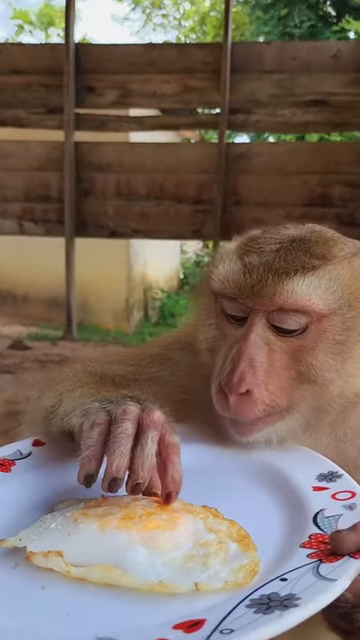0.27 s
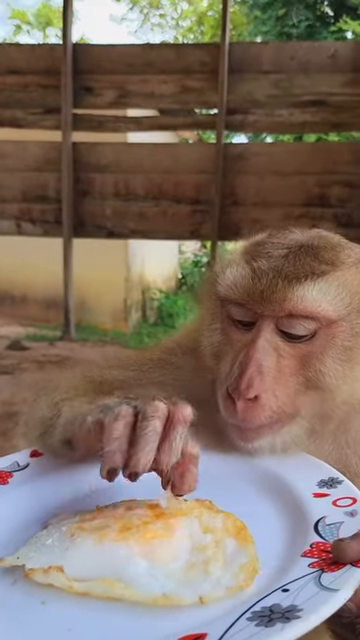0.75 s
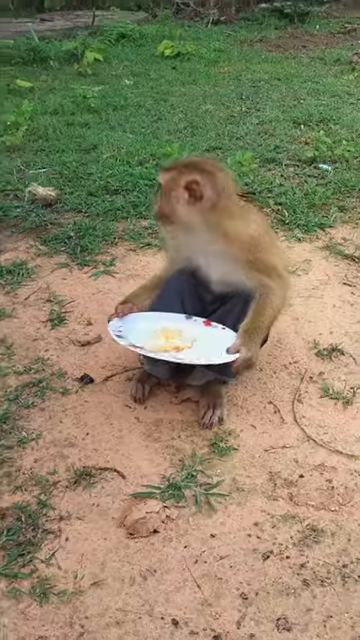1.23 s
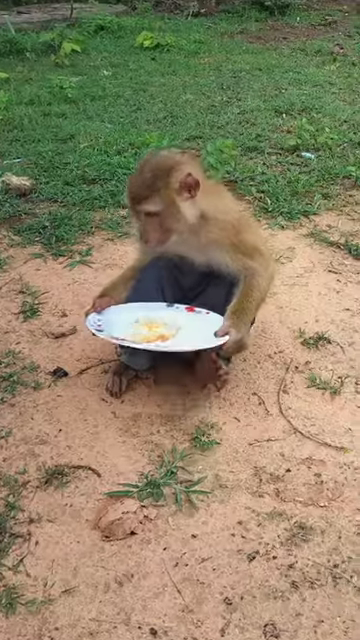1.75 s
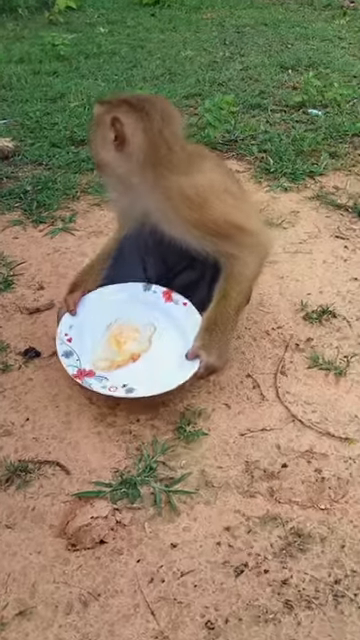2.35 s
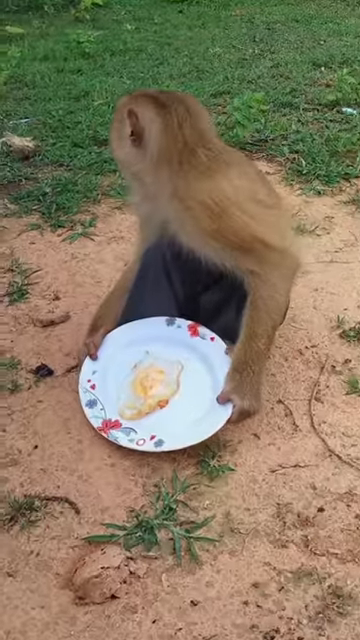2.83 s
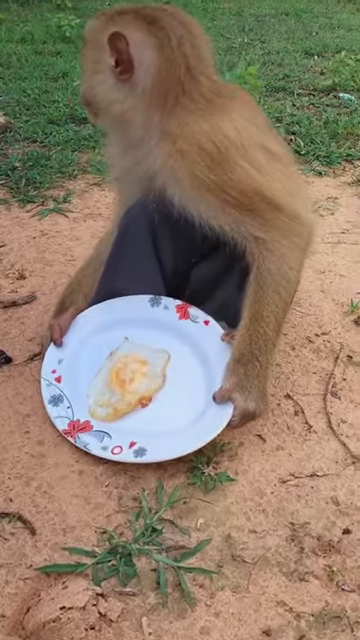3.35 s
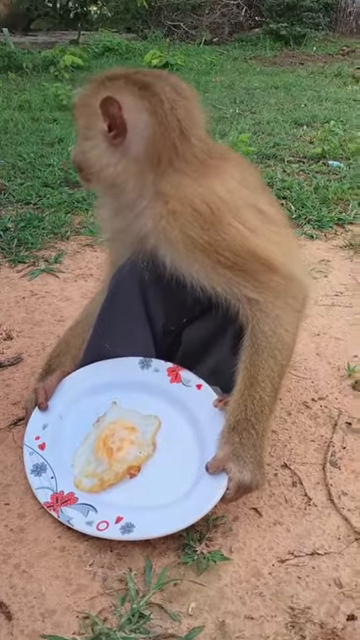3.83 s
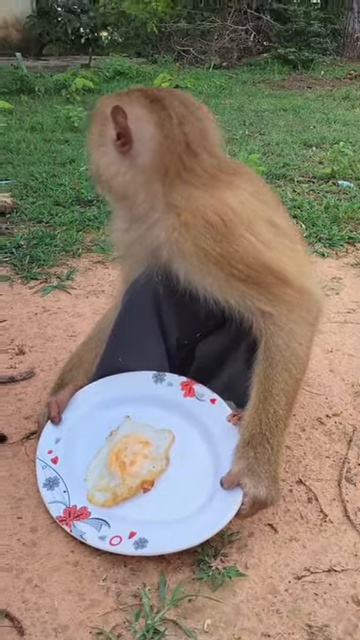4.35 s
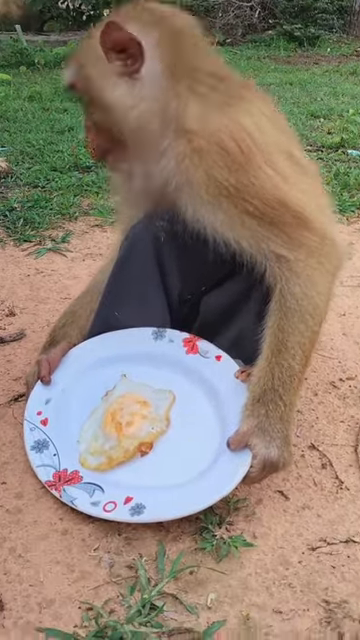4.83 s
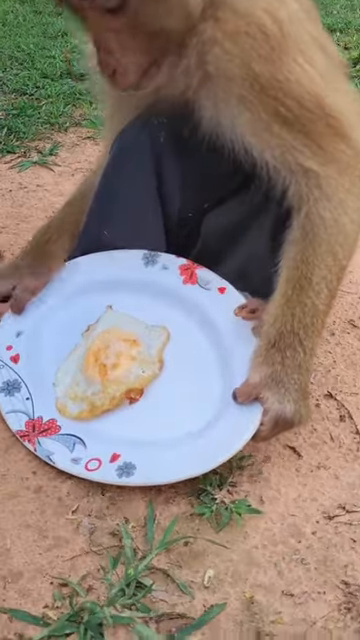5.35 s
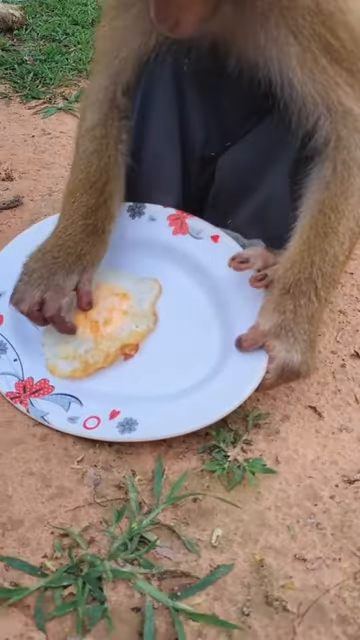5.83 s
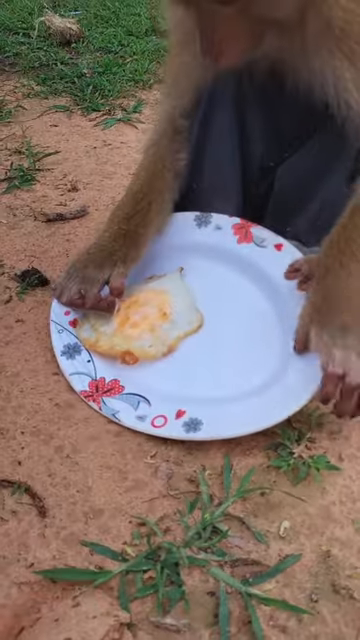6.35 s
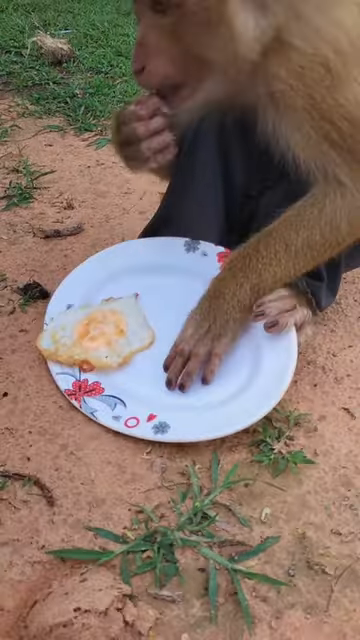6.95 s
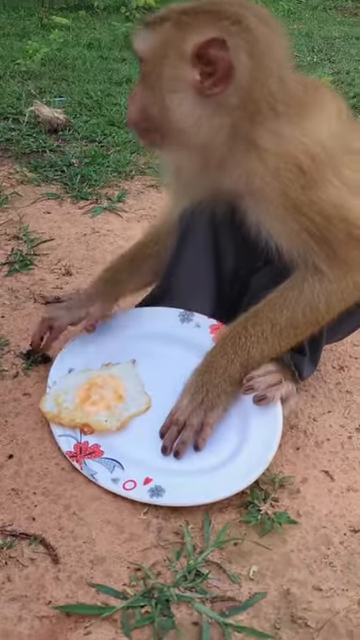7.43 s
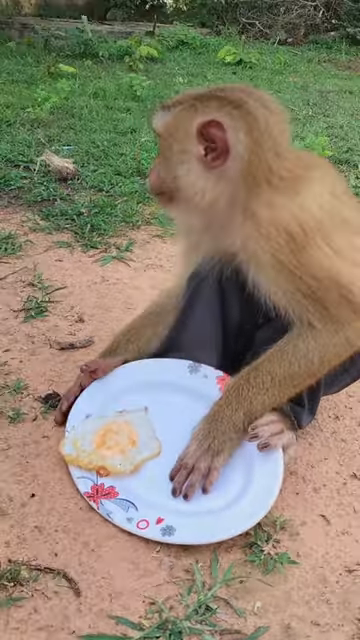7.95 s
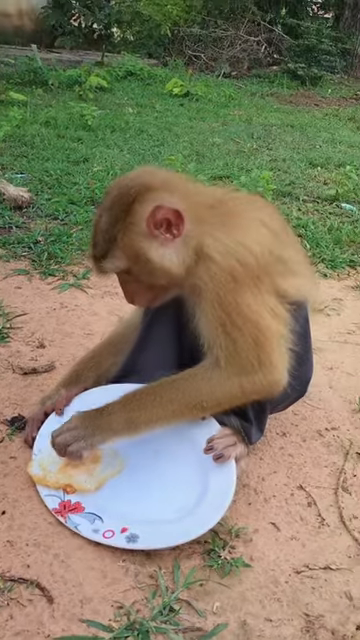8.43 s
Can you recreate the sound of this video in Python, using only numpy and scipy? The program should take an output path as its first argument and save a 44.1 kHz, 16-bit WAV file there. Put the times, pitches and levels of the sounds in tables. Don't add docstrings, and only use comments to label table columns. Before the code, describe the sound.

A monkey a few metres away gives short, rounded, raspy barks, singly and then in a quick cluster past the middle. Each starts with a puff of breath and is followed by brief yard echoes. Under them are a low throbbing distant engine, far traffic and leaves, and soft wind buffets. Sand and fur rustle, feet scuff, and grit or claws click. Handheld stereo phone outdoors.

```python
import sys
import numpy as np
from scipy import signal
from scipy.fft import rfft, irfft, next_fast_len
from scipy.io import wavfile
from scipy.ndimage import uniform_filter1d

SR = 44100
rng = np.random.default_rng(int(sys.argv[2]) if len(sys.argv) > 2 else 0)


def gain_from_db(level_db):
    decades = np.asarray(level_db, float) / 20
    return 10 ** decades


def store_pcm(level_fs):
    pcm = np.round(np.clip(level_fs, -1, 1) * 32767).astype(np.int16)
    wavfile.write(sys.argv[1], SR, np.atleast_2d(pcm).T)


N = 383229
TIME = np.arange(N) / SR


def colour(x, points):
    hz, db = np.transpose(points)
    size = next_fast_len(x.shape[-1])
    f = np.maximum(np.arange(size // 2 + 1) * SR / size, 1)
    octaves_outside = np.maximum(np.log2(hz[0] / f), 0) + np.maximum(np.log2(f / hz[-1]), 0)
    gain = gain_from_db(np.interp(np.log(f), np.log(hz), db) - 18 * octaves_outside)
    gain = gain / np.sqrt(np.mean(gain ** 2))
    return irfft(rfft(x, size) * gain, size)[..., :x.shape[-1]]


def resonate(x, modes):
    size = next_fast_len(2 * len(x))
    f = np.arange(1, size // 2 + 2) * SR / size
    gain = 0
    for k, (hz, width, db) in enumerate(modes):
        detune = (f / hz - hz / f) * hz / width
        gain = gain + (-1) ** k * gain_from_db(db) / (1 + 1j * detune) ** 2
    y = irfft(rfft(x, size) * gain, size)[:len(x)]
    return y / np.std(y)


def walk(rate, size=N):
    k = int(SR / rate)
    held = np.repeat(rng.standard_normal(size // k + 1), k)
    return 1.79 * uniform_filter1d(uniform_filter1d(held, k), k)[:size]


def curves(table, t):
    s, *columns = np.transpose(table)
    return [np.interp(t, s, c) for c in columns]


def sides(pan_db):
    return gain_from_db(np.array([pan_db, -pan_db]) / 2)


# (f/Hz, level/dB per Hz)
AIR_SPECTRUM = [(15, -35.5), (25, -23), (121, 2.5), (201, -10), (286, -14.5), (408, -17.5), (446, -18.5),
                (595, -14.5), (636, -26), (695, -16.5), (830, -22), (3590, -37.5), (5000, -73), (6500, -78),
                (11000, -120)]


def air():
    mid, side = colour(rng.standard_normal((2, N)), AIR_SPECTRUM)
    side = signal.sosfilt(signal.butter(1, 350, "high", fs=SR, output="sos"), side)
    both = np.array([mid + side, mid - side])
    low = signal.sosfilt(signal.butter(2, 1000, fs=SR, output="sos"), both)
    high = both - low
    low_swell = gain_from_db(1.1 * walk(2) + 1.2 * walk(7))
    high_swell = gain_from_db(2.1 * walk(23) - 5.8)
    return gain_from_db(-50.5) * (low_swell * low + high_swell * high)


# (t/s, firing rate f/Hz, loudest multiple, level/dB)
ENGINE_COURSE = [(0.0, 20.8, 7.4, -47), (1.0, 19.6, 7.0, -56.5), (1.16, 19.8, 5.0, -43.5),
                 (2.1, 19.9, 5.0, -43.5), (2.25, 18.4, 7.0, -45), (2.9, 19.9, 7.3, -49.5),
                 (3.85, 19.9, 7.0, -44.5), (4.6, 19.9, 7.1, -47), (5.1, 20.2, 6.7, -63.5),
                 (5.45, 20.3, 6.0, -44), (6.2, 19.6, 6.0, -47), (6.6, 19.8, 7.1, -49),
                 (7.6, 19.8, 7.2, -47), (8.08, 19.9, 7.0, -46), (8.69, 19.9, 7.0, -48.5)]
# (multiple, level/dB)
BOOMING_LINES = [(5, 2.5), (6, -1.5), (7, 2), (8, 3.5)]
# (multiple, level/dB)
STEADY_LINES = [(3, -69.5), (4, -56), (9, -76), (11, -73.5), (12, -62.5), (13, -65), (14, -61.5),
                (16, -75.5)]


def engine():
    hz, loudest, level_db = curves(ENGINE_COURSE, TIME)
    turn = 2 * np.pi * np.cumsum(hz) / SR
    lines = list(STEADY_LINES)
    for k, db in BOOMING_LINES:
        off_boom_db = np.minimum(12 * abs(k - loudest), 12)
        lines.append((k, level_db + db - off_boom_db))
    apart = np.array([[1], [-1]])
    hum = np.zeros((2, N))
    for k, db in lines:
        level = gain_from_db(db + 1.38 * walk(8))
        waver = 0.74 * walk(8) + 0.11 * walk(0.75) * apart
        hum += level * np.sin(k * turn + waver)
    return gain_from_db(0.5) * hum


# (t/s, peak level/dB)
GUSTS = [(0.02, -62), (0.58, -46), (1.09, -46.5), (1.4, -63), (2.13, -60), (2.47, -42.5), (2.88, -56),
         (3.85, -41), (4.5, -64), (5.13, -50), (5.47, -49), (5.779, -57), (6.9, -54.5), (7.53, -57.5)]


def wind():
    buffets = [(18, 1.5), (35, -8.0), (60, -1.5), (90, -8.5)]  # (f/Hz, level/dB per Hz)
    shared, left, right = colour(rng.standard_normal((3, N)), buffets)
    gust_s, calm_db, lull_s, lull_db_per_s = 0.056, -58, 6.9, -18
    gusts = sum(gain_from_db(db) * np.exp(-abs(TIME - s) / gust_s) for s, db in GUSTS)
    calm = gain_from_db(calm_db + lull_db_per_s * np.maximum(TIME - lull_s, 0))
    return (calm + gusts) * (shared + np.array([gain_from_db(3) * left, gain_from_db(-3) * right]))


# (t/s, length/s, start f/Hz, end f/Hz, level/dB)
WHISTLES = [
    (4.44, .06, 4200, 3000, -68),
    (5.588, .053, 3800, 3040, -63),
    (5.92, .04, 3500, 3400, -68),
    (4.375, .03, 3300, 3800, -62),
    (7.56, .065, 9900, 11000, -80),
    (7.655, .07, 12700, 13100, -84),
    (7.65, .045, 11700, 11900, -84),
]


def bird():
    out = np.zeros(N)
    for s, length, start_hz, end_hz, db in WHISTLES:
        u = np.clip((TIME - s) / length, 0, 1)
        flutter = gain_from_db(db + 4 * walk(300))
        hz = (start_hz + (end_hz - start_hz) * u) * (1 + 0.029 * walk(250))
        out += flutter * np.sin(np.pi * u) * np.sin(2 * np.pi * np.cumsum(hz) / SR)
    return sides(-5)[:, None] * out


# (t/s, level/dB)
STIRRING = [(0.0, -72.5), (0.65, -68.5), (0.84, -69), (1.28, -66.5), (1.7, -72.5), (2.2, -69), (2.6, -64),
            (2.9, -69.5), (3.5, -70.5), (3.95, -68), (4.45, -76), (5.3, -75), (5.71, -68.5), (6.19, -69),
            (6.7, -72.5), (7.12, -77), (7.82, -72), (8.69, -73)]
# (f/Hz, level/dB per Hz)
SAND_SPECTRUM = [(700, -1.5), (1500, 1.5), (2500, 1), (4000, 0), (5500, -20), (7000, -36.5)]
# (f/Hz, level/dB per Hz)
GRIT_SPECTRUM = [(4500, -7), (7000, -4.5), (10000, -1.5), (13000, -8.5), (15000, -11)]


def rustle():
    sand_db = curves(STIRRING, TIME)[0]
    grit_db = sand_db - 5.5
    grains = rng.standard_normal((2, 2, N)) * gain_from_db(2.62 * rng.exponential(size=(2, 2, N)) - 3.5)
    sand_level = gain_from_db(sand_db + 7.0 + 1.0 * walk(76))
    sand = sand_level * colour(grains[0], SAND_SPECTRUM) * sides(-0.73)[:, None]
    grit_level = gain_from_db(grit_db + 2.0 + 0.8 * walk(62))
    grit = grit_level * colour(grains[1], GRIT_SPECTRUM)
    left_tilt = [(3000, 8.5), (9000, -2), (11500, -3.5), (16000, 7.5)]  # (f/Hz, level/dB)
    return sand + np.array([gain_from_db(4.5) * colour(grit[0], left_tilt), grit[1]])


# (t/s, length/s, level/dB, centre f/Hz, left minus right level/dB)
DRAGS = [(0.38, 0.075, -68, 3950, -1), (0.784, 0.15, -49, 3060, -4), (1.36, 0.072, -66, 3600, -8),
         (3.115, 0.053, -51, 4180, -1), (3.118, .045, -47, 1310, 5.5), (3.244, 0.158, -55, 2660, -9.5),
         (3.53, 0.156, -55.5, 819, 0), (3.818, .035, -54, 2800, -8), (3.863, 0.11, -65, 5040, 10.5),
         (3.969, 0.074, -52.5, 4840, 2.5), (5.131, 0.084, -57, 2603, -8)]


def scuffs():
    out, size = np.zeros((2, N)), 9000
    for s, length, db, hz, pan_db in DRAGS:
        treble_db = -20 + 14 * np.log2(hz / 2800)
        grains = rng.standard_normal((2, size)) * gain_from_db(2.73 * rng.exponential(size=(2, size)) - 4.5)
        u = np.arange(size) / SR / length
        swell = np.clip(np.minimum(.5 + u, (1 - u) * 4.9), 0, 1) * gain_from_db(0.79 * walk(60, size=size))
        band = colour(grains, [(hz / 3, -12), (hz / 2.0, 0), (hz * 1.19, 0), (hz * 2.02, treble_db),
                               (15000, treble_db - 1.5)])
        start = int(s * SR)
        out[:, start:start + size] += gain_from_db(db) * sides(pan_db)[:, None] * swell * band
    return out


# (t/s, peak level/dB, ring f/Hz, tick level/dB, left minus right level/dB)
SNAPS = [(0.2071, -41, 4130, -17, -25.5), (0.717, -30, 2100, -12.5, -17), (1.0807, -65, 2240, -23, 12),
         (2.1794, -49, 2310, -28, -12), (4.3864, -41, 2676, -47, -2), (5.1237, -20.5, 2940, -53, -10.5),
         (5.663, -45, 3680, -14, -13), (5.7437, -46, 5300, -14, -9), (5.7605, -45, 3720, -34, -16),
         (5.7837, -49, 2360, -24, -19), (5.8109, -42, 2498, -9, -19), (6.573, -40.5, 2692, -39, 4),
         (7.1911, -53, 2755, -18, -1), (7.4051, -50, 2120, -9, -1)]


def clicks():
    size = 900
    out, t = np.zeros((2, N + size)), np.arange(size) / SR
    ring_s, tick_s, thud_s = 0.00019, 0.00045, 0.00059
    for k, (s, db, hz, tick_db, pan_db) in enumerate(SNAPS):
        snap = -np.sin(2 * np.pi * hz * t) * np.e * t / ring_s * np.exp(-t / ring_s)
        tick = gain_from_db(tick_db) * rng.standard_normal((2, size)) * np.exp(-t / tick_s)
        thud_db = -5 if k else 16.5
        thud = gain_from_db(thud_db) * np.sin(2 * np.pi * 750 * t) * np.exp(-t / thud_s)
        start = int(s * SR)
        out[:, start:start + size] += gain_from_db(db) * sides(pan_db)[:, None] * (snap + tick + thud)
    return out[:, :N]


# (level/dB at start, burst, peak, end of hold, end)
TONE_ENVELOPE = (-28, -13.5, 0, -2.5, -24)
CHEST_ENVELOPE = (-21.5, 0.5, -6.5, -12, -21)
RASP_ENVELOPE = (-31.5, -3, -3, -6, -18)
MOUTH_ENVELOPE = (-41.5, -12.5, -2.5, -4.5, -10.5)


def gesture(start, swell, hz, tone_db, breath_db, hold, chest_db, scoop_hz):
    burst_share, release_s, end_drift_hz = 0.479, 0.055, 2.9
    s = start + np.array([0, burst_share * swell, swell, swell + hold, swell + hold + release_s])
    pitch = hz + np.array([scoop_hz, scoop_hz, 0, 0, end_drift_hz])
    tone = tone_db + np.array(TONE_ENVELOPE)
    chest = breath_db + chest_db + np.array(CHEST_ENVELOPE)
    rasp = breath_db + np.array(RASP_ENVELOPE)
    mouth = breath_db + np.array(MOUTH_ENVELOPE)
    return np.transpose([s, pitch, tone, chest, rasp, mouth])


# (multiple of the pitch, level/dB)
UPPER_STACK = [(3, -1.5), (4, -2), (5, -7.5)]
# (f/Hz, width/Hz, level/dB)
CHEST_MODES = [(466.6, 185, 0)]
THROAT_MODES = [(620, 240, 2), (900, 260, -4), (1270, 200, -1)]
MOUTH_MODES = [(1650, 240, -7), (2000, 300, 0), (2620, 380, 1), (3150, 420, -12.5)]
TEETH_MODES = [(6220, 1200, -33.5), (9300, 4300, -44)]


def bark(table, octave_db, upper_db, turn_db):
    first = int(table[0][0] * SR)
    t = np.arange(first, first + 8000) / SR
    hz, tone_db, chest_db, rasp_db, mouth_db = curves(table, t)
    n = len(t)
    turn = 2 * np.pi * np.cumsum(hz * (1 + 0.013 * walk(200, size=n))) / SR
    tone_level = gain_from_db(tone_db + 1.0 * walk(55, size=n) + 1.5 * walk(160, size=n))
    tone = np.sqrt(2) * tone_level * np.sin(turn)
    stack = gain_from_db(octave_db + 5.5 + 2.73 * walk(70, size=n)) * np.sin(2 * turn)
    for k, db in UPPER_STACK:
        lips = 1 / (1 + (k * hz / 3050) ** 12)
        stack = stack + lips * gain_from_db(upper_db + db + 3 * walk(70, size=n)) * np.sin(k * turn)
    stack = stack * gain_from_db(.5 * (tone_db + mouth_db) - 9.0)

    puffs = rng.standard_normal((4, n)) * (1 + 0.94 * np.cos(turn))
    chest = gain_from_db(chest_db) * resonate(puffs[0], CHEST_MODES)
    throat = gain_from_db(rasp_db + 4.5 + 1.4 * walk(118, size=n)) * resonate(puffs[1], THROAT_MODES)
    lift = (np.median(hz[:n // 3]) / 600) ** 0.44
    lifted = [(f * lift, width, db) for f, width, db in MOUTH_MODES[:2]]
    tract = lifted + MOUTH_MODES[2:] + TEETH_MODES
    glance = [resonate(puffs[2] + .7 * way * puffs[3], tract) for way in (1, -1)]
    mouth = gain_from_db(mouth_db - 0.5 + 2.1 * walk(120, size=n)) * np.array(glance)

    fade = np.clip(np.minimum(t - t[0], 0.6 * (table[-1][0] - t)) / 0.022, 0, 1)
    low, middle, bright = [sides(db)[:, None] for db in (turn_db + 0.5, -0.82, -5.5)]
    return fade * (low * (tone + chest) + middle * throat + bright * (stack + mouth))


# (t/s, swell to the peak/s, pitch f/Hz, tone level/dB, breath level/dB)
BARK_CUES = [(.56, 0.077, 601.2, -29.5, -36.5), (.905, 0.064, 579.6, -39, -42),
             (1.105, 0.066, 579, -19.5, -35), (1.668, 0.083, 585, -15, -31),
             (2.44, 0.048, 609.6, -19, -34.5), (3.885, 0.052, 581.6, -15.5, -34),
             (4.247, 0.073, 598, -23.5, -35), (4.65, .072, 608, -19.5, -33), (6.22, 0.073, 638, -20.5, -31),
             (6.565, 0.066, 666.2, -15, -28.5), (6.715, 0.044, 586.6, -22, -33.5),
             (6.88, 0.054, 556, -23.5, -38), (7.07, 0.071, 544, -34.5, -46),
             (7.568, 0.069, 533, -44.5, -45.5), (7.922, 0.0641, 578.1, -20, -33.5),
             (8.318, 0.051, 564.4, -30.5, -41.5), (7.155, 0.041, 614.5, -41, -47)]
# (overtone level/dB, hold/s, head turn as left minus right level/dB,
# chest over breath level/dB, pitch at the burst minus pitch at the peak f/Hz)
BARK_MANNER = [(7.5, 0.014, -0.5, 10, -61), (-4, 0.018, -3.5, 6, -50), (0.5, 0.024, 4, -3, -27),
               (-3, 0.012, 1.5, -6.5, -6), (4, 0.047, -1.5, -2, 24), (6, 0.023, -0.5, 0, -2),
               (-2, .015, 3, 1, 50.5), (-0.5, 0.011, 3, -7, -19.5), (-0.5, 0.015, 3, -10.5, 50.5),
               (-2.5, .014, 1.5, -11.5, 22.5), (1, 0.045, 3, -24, 1.5), (1, 0.021, -7, -15.5, -10),
               (-1.5, 0.011, 0, 2, -12), (3, 0.015, -1, 6.5, -7), (1, 0.019, -4.5, -1.5, -41.5),
               (-6, .008, -2, 0, -4), (3.5, 0.0096, -1.5, 6.5, -5)]


def monkey():
    out = np.zeros((2, N))
    for cue, (octave_db, hold, turn_db, chest_db, scoop_hz) in zip(BARK_CUES, BARK_MANNER):
        upper_db = octave_db - 2
        voice = bark(gesture(*cue, hold, chest_db, scoop_hz), octave_db, upper_db, turn_db)
        start = int(cue[0] * SR)
        out[:, start:start + voice.shape[1]] += voice
    return out


# (t60/s, level/dB)
SCATTER = [(.3, -5), (1.6, -24.5)]
# (t/s, level/dB, left minus right level/dB, extra lag at the right port t/s)
HARD_ECHOES = [
    (.024, -16.5, 9.5, -.0002),
    (.052, -13, 0.5, .0003),
    (.078, -17.5, -5, -.0003),
    (.105, -18, -1, .0001),
    (.2, -34.5, -5.5, -.0002),
]


def yard(dry):
    t = np.arange(SR) / SR
    mid, side = rng.standard_normal((2, SR))
    side = signal.sosfilt(signal.butter(2, 650, "high", fs=SR, output="sos"), side)
    scatter = np.array([mid + side, mid - side])
    decay = sum(gain_from_db(db - 60 * t / t60) / np.sqrt(SR * t60 / np.log(1e6)) for t60, db in SCATTER)
    response = scatter * decay * np.minimum(t / 0.026, 1)
    for s, db, pan_db, lag_s in HARD_ECHOES:
        arrivals = [int(s * SR), int((s + lag_s) * SR)]
        response[[0, 1], arrivals] += gain_from_db(db) * sides(pan_db)
    response = signal.sosfilt(signal.butter(1, 6000, fs=SR, output="sos"), response)
    wet = signal.fftconvolve(dry.mean(axis=0)[None], response, axes=1)[:, :N]
    left, right = gain_from_db(1.0) * dry + wet
    port_lag_s = 0.0002
    return np.array([left, np.interp(TIME - port_lag_s, TIME, right)])


def scene():
    background = air() + engine() + wind() + bird()
    return background + rustle() + scuffs() + clicks() + yard(monkey())


def low_pass(x):
    return signal.sosfilt(signal.butter(12, 16090, fs=SR, output="sos"), x)


def record(dry):
    dry = signal.sosfilt(signal.butter(2, 24, "high", fs=SR, output="sos"), dry)
    dry = signal.sosfilt(signal.ellip(8, .2, 70, 15400, fs=SR, output="sos"), dry)
    return low_pass(dry)


dry = scene()
out = record(dry)
store_pcm(out)
```